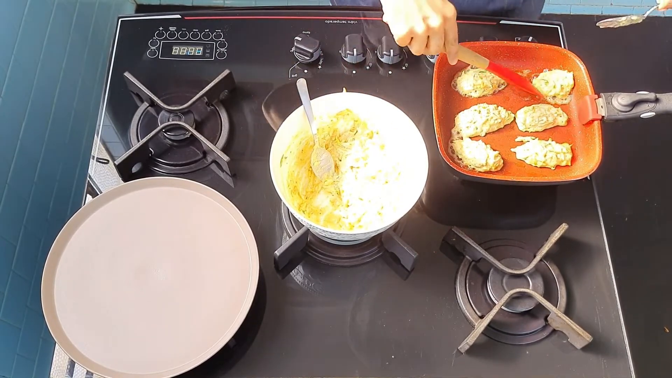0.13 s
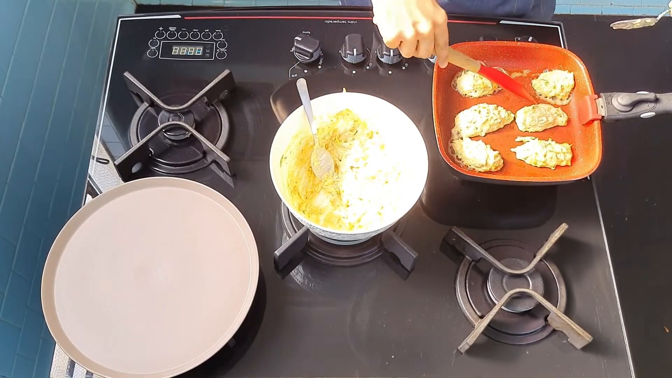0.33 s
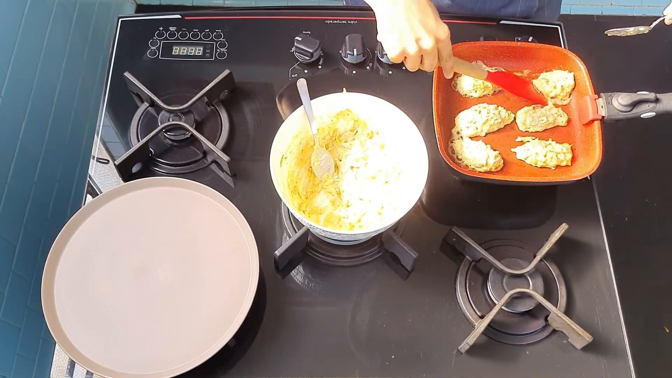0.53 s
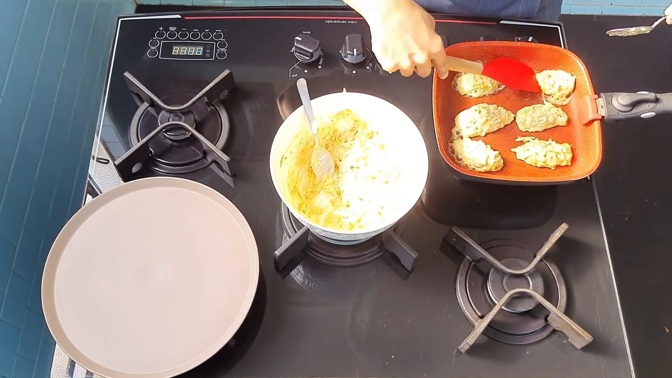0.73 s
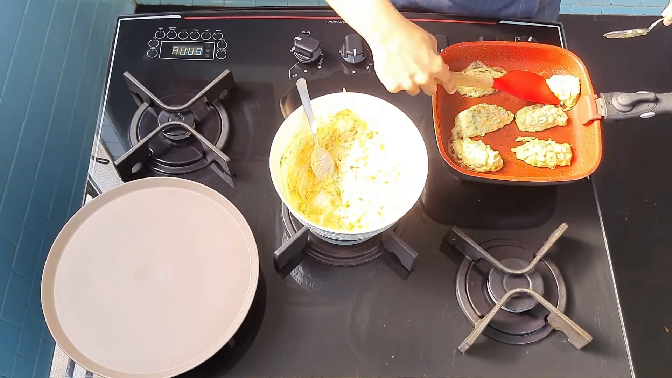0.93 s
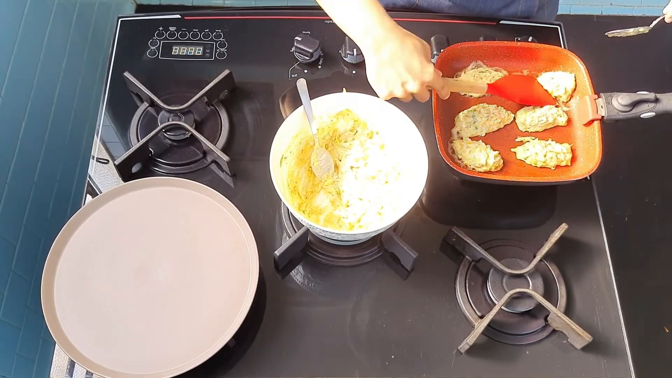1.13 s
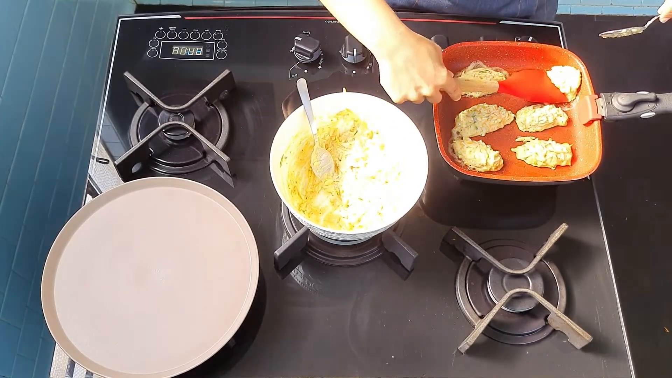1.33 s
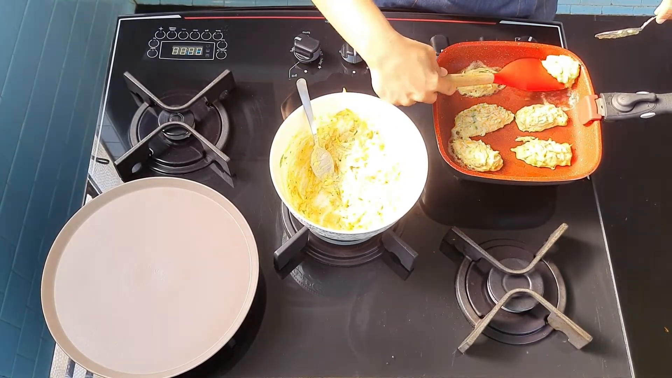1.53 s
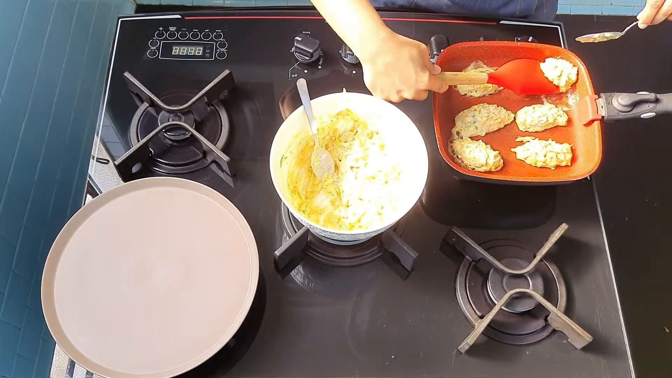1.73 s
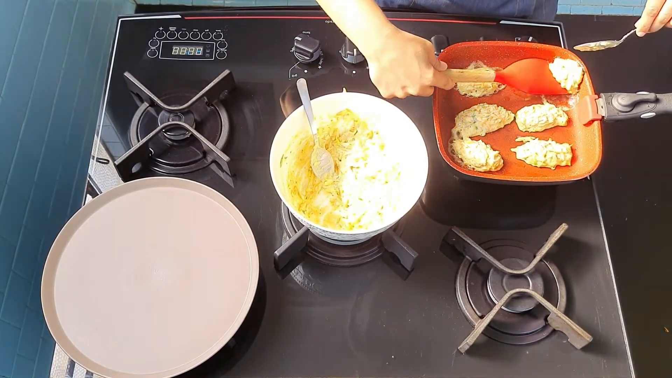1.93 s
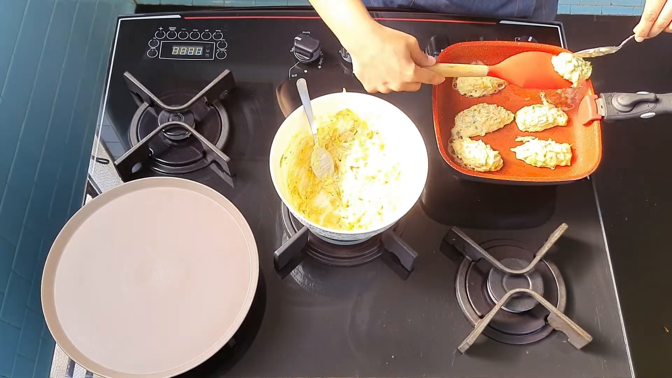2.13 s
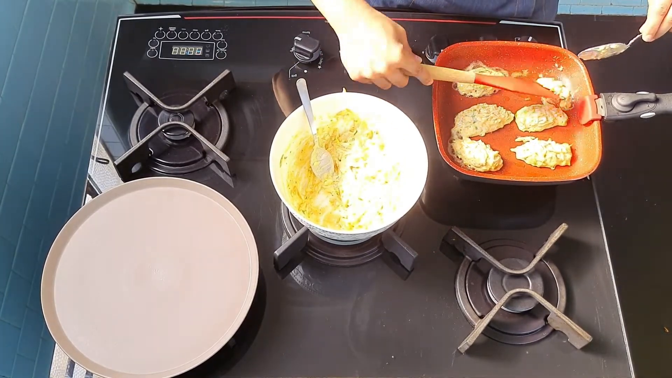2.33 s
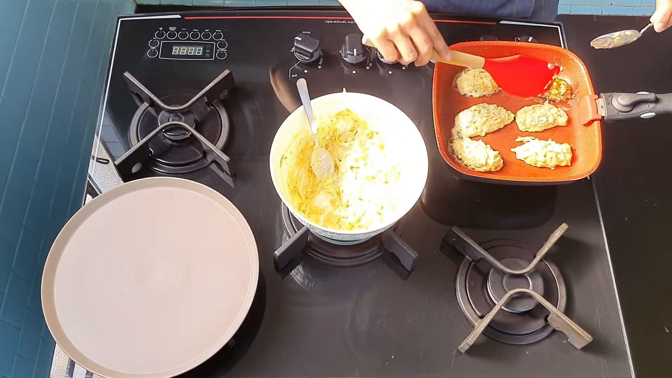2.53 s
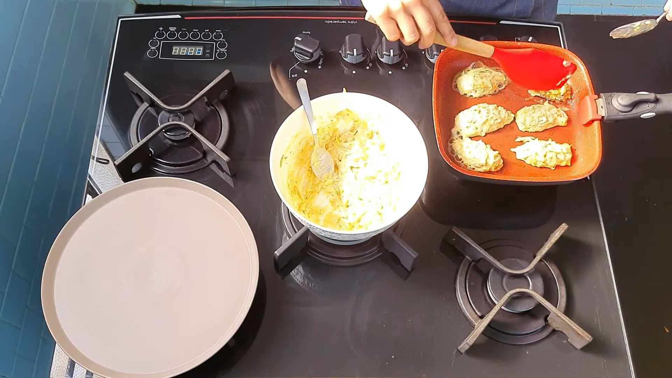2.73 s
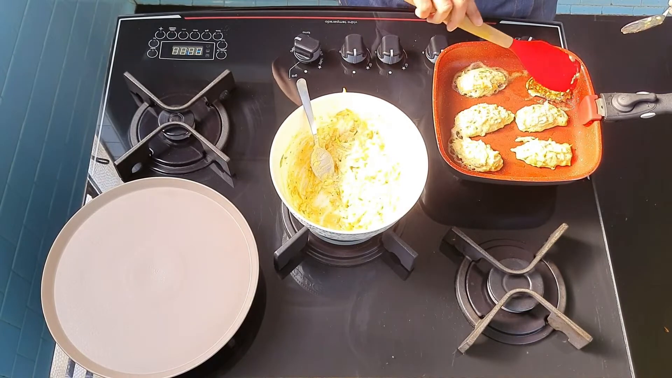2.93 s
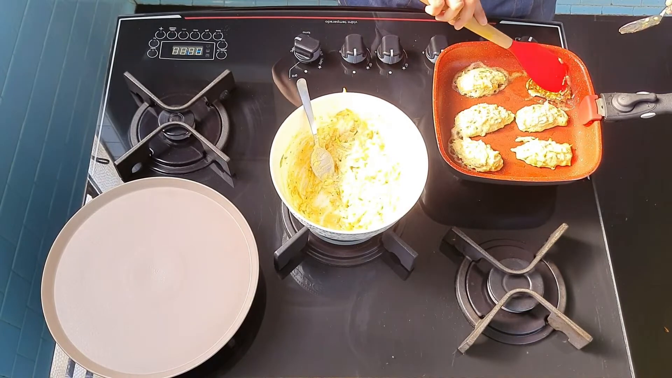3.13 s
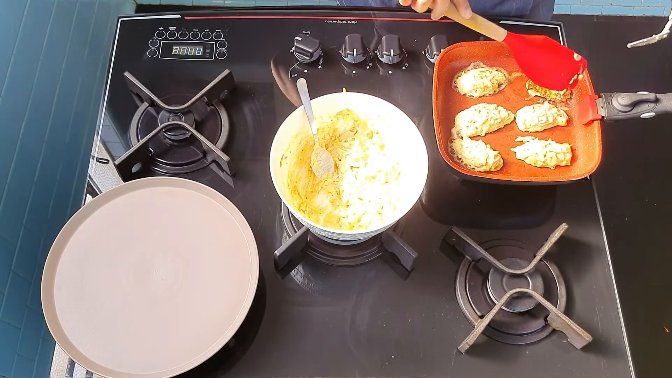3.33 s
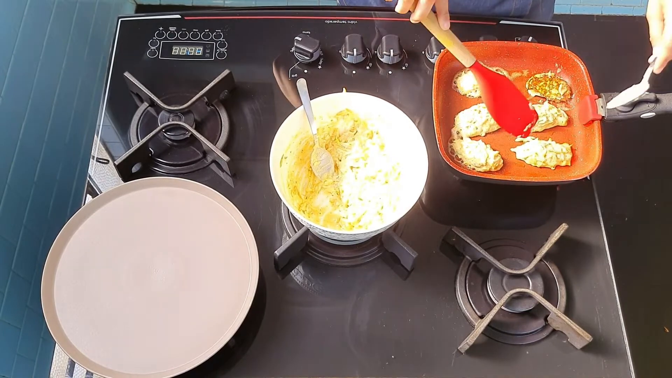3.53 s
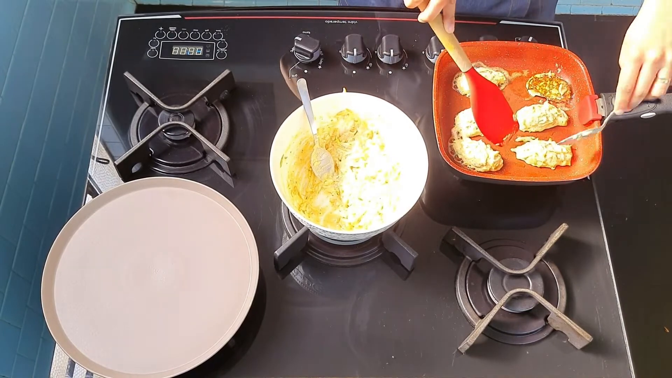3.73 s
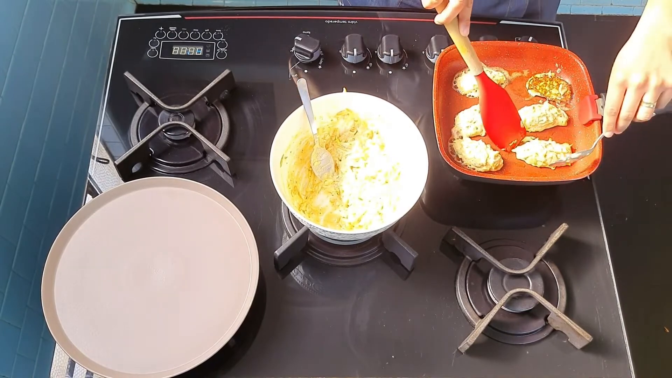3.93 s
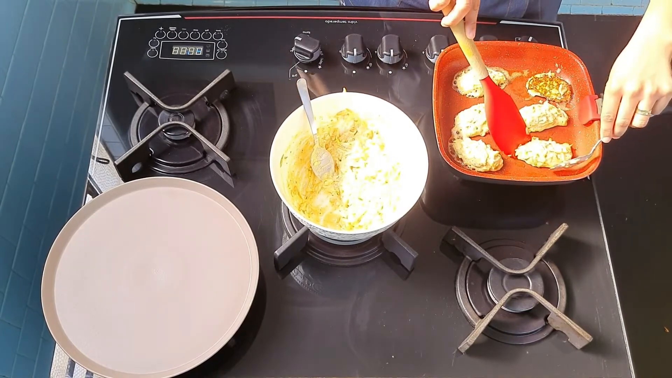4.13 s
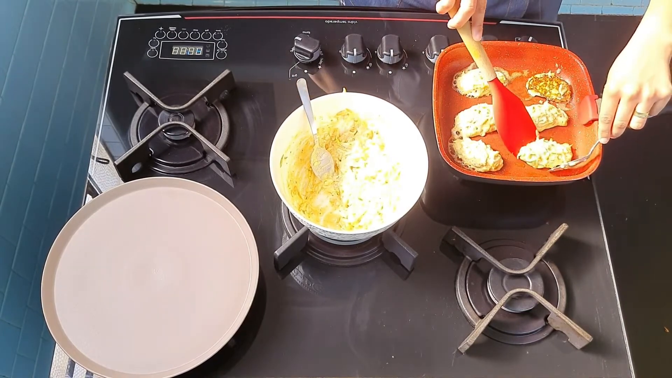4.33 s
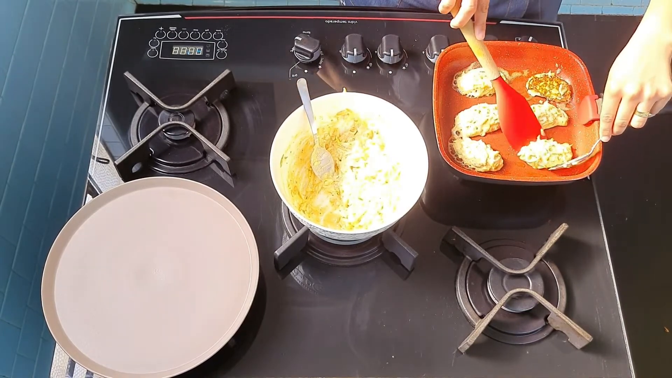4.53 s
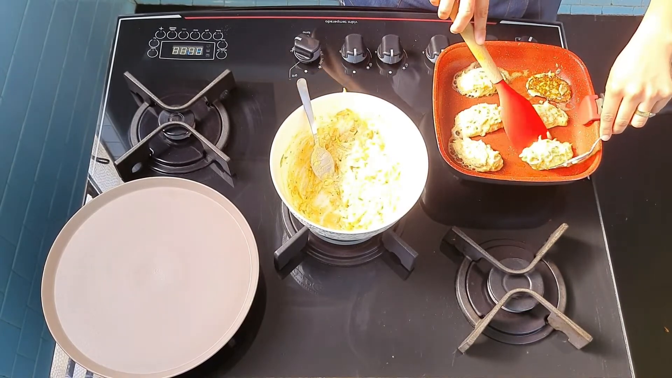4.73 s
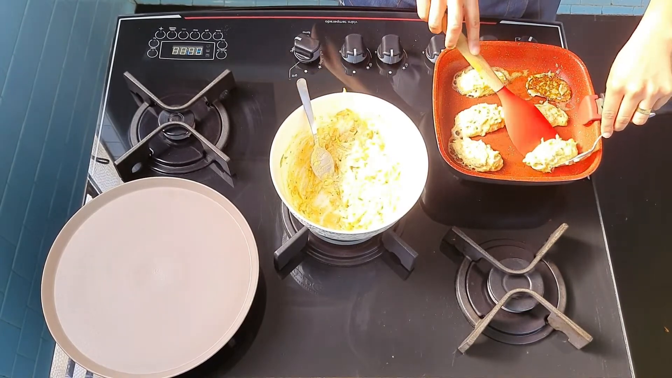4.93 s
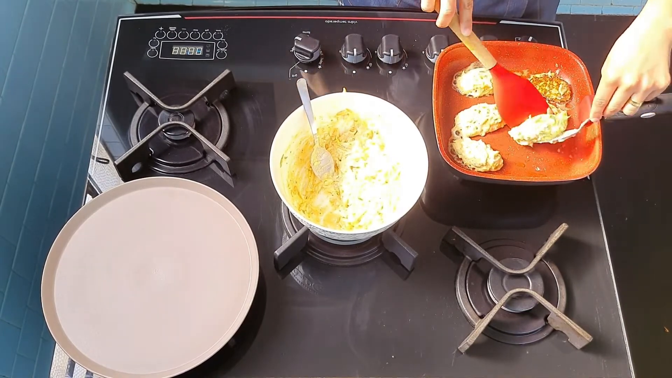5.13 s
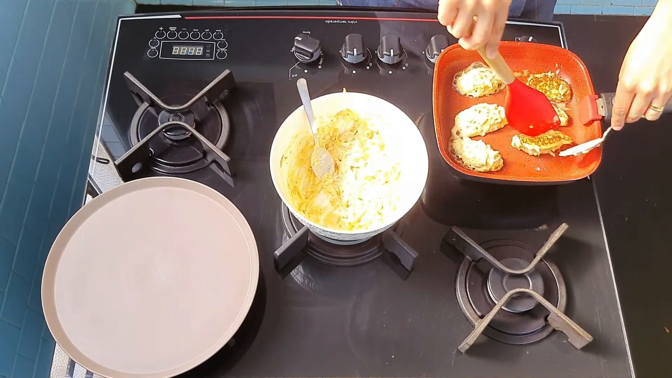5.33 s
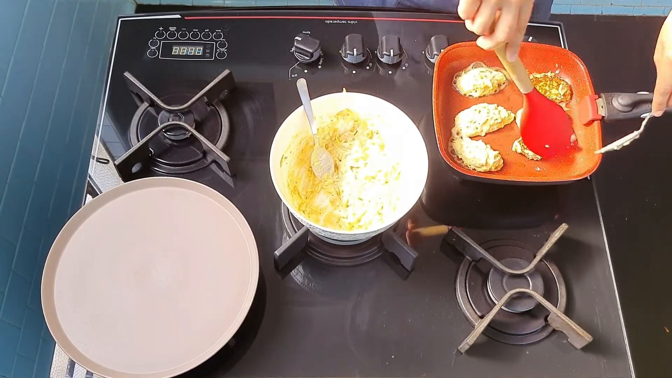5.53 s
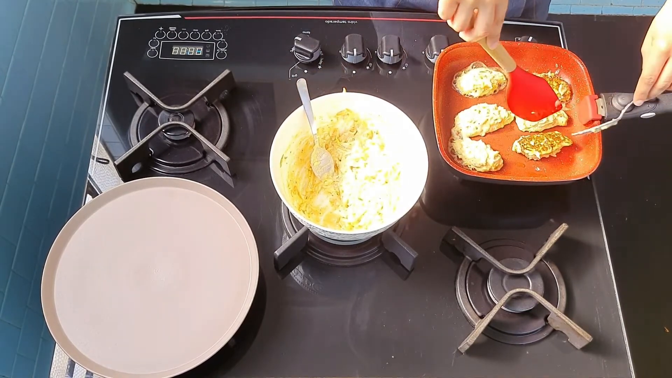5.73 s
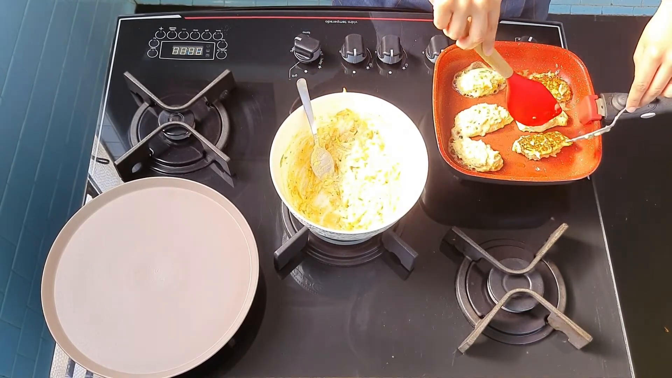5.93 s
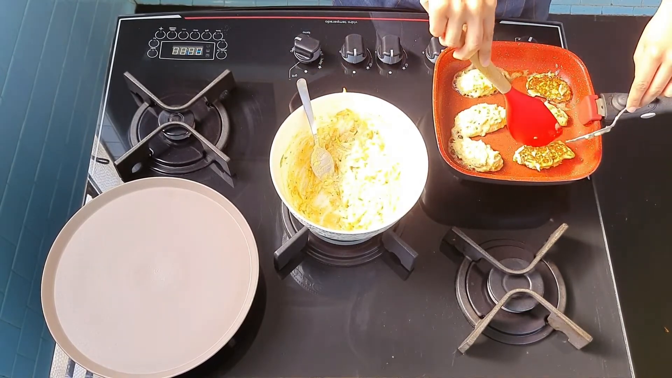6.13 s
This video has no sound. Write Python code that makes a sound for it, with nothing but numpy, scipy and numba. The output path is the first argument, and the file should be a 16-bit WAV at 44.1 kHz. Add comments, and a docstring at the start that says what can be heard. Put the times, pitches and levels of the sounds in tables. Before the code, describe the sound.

Fritters fry in shallow oil, heard close from above by a small, bright microphone with little bass and very short reflections. A faint fan rush and steady mid-pitched hum swell slightly early on, then stay behind. At first the sizzle is thin, with a sharp spit at once. From 0.4 to 1.1 seconds it grows into crackling flurries, with tiny spatula taps near 0.7 and 1.1. Until about 1.9 it is patchy and hollow, its ringing pitches sliding as steam is trapped. A lull follows from 2.1 to 2.55. At 2.6 the oil flares abruptly, spitting hard, with hollow pan ringing and short, low steam gurgles until 3.4. From about 3.6 the frying evens out, airy and steady with scattered pops. Around 5.4 to 5.7 it intensifies with dense crackles and a few more gurgles, and keeps sizzling strongly to the end at 6.2.

```python
"""Vegetable fritters fry in shallow oil, heard by a small microphone from above the stove.
Crowds of damped-sine steam bubbles burst in flurries; steam vents under the fritters ring the pan.
Single drops spit and stir up the fizz, steam gurgles, a spatula taps and slides pitches;
frying flares when a wet side meets the oil. Behind it an extractor fan rushes (noise) and hums (sines)."""
import sys
import numpy as np
from scipy import signal
from scipy.fft import rfft, irfft
from scipy.io import wavfile
from scipy.ndimage import uniform_filter1d
from numba import njit

SR = 44100
rng = np.random.default_rng(int(sys.argv[2]) if len(sys.argv) > 2 else 0)


def decibels_to_gain(level_db):
    """Convert a level in decibels to a linear amplitude gain (20 dB per decade)."""
    exponent = np.asarray(level_db, float) / 20
    return 10 ** exponent


def file_out(sig):
    """Save sig as 16-bit WAV at sys.argv[1]."""
    # one column per channel
    cols = np.atleast_2d(sig).T
    # limit, then scale
    lim = np.clip(cols, -1, 1)
    pcm = np.round(lim * 32767).astype(np.int16)
    wavfile.write(sys.argv[1], SR, pcm)


N = 272538
TIME = np.arange(N) / SR


def colour(x, points):
    """Shapes a spectrum by (frequency [Hz], gain [dB]) points, joined on a log frequency axis."""
    hz, db = np.transpose(points)
    f = np.arange(N // 2 + 1) * SR / N + 1
    gain = decibels_to_gain(np.interp(np.log(f), np.log(hz), db))
    return irfft(rfft(x) * gain, N)


def unit(x):
    """Scales to rms 1."""
    return x / np.sqrt(np.mean(x ** 2))


@njit
def svf(x, g, k):
    """State-variable band-pass whose centre may move, gain 1 at the centre."""
    y, b, l = np.empty(len(x)), 0., 0.
    for i in range(len(x)):
        v = (b + g[i] * (x[i] - l)) / (1 + g[i] * (g[i] + k))
        b, l, y[i] = 2 * v - b, l + 2 * g[i] * v, k * v
    return y


def band(x, hz, width):
    """Two-pole resonance along a pitch track; its width follows the pitch in proportion."""
    return svf(x + 1e-18, np.tan(np.pi * hz / SR), width / np.mean(hz))


def walk(rate):
    """Random levels held 1 / rate s and slewed; spread 1."""
    hold = int(SR / rate)
    steps = rng.standard_normal(N)[np.arange(N) // hold]
    return unit(uniform_filter1d(steps, hold))


@njit
def ring(start, hz, cycles, size, n, sr):
    """Each burst is a damped sine that loses 8.7 dB over its count of cycles."""
    out = np.zeros(n)
    for k in range(len(start)):
        turn = np.exp(hz[k] / sr * (2j * np.pi - 1 / cycles[k]))
        z = size[k] + 0j
        for i in range(start[k], min(n, start[k] + int(6 * cycles[k] * sr / hz[k]))):
            z *= turn
            out[i] += z.imag
    return out


# Spectrum of the fan's air rush: (frequency [Hz], relative density [dB per Hz])
FAN_RUSH = [(20, -31), (50, -7), (120, -0.5), (200, 2.5), (400, 1.5), (600, 4), (1000, -1), (1600, -4),
            (3000, -19.5), (16000, -7.5)]
# Fan hum, swelling in at first: (time [s], fourth multiple of the blade rate [Hz], swell [dB])
FAN_HUM = [(0, 705.6, -12), (.3, 705.6, 0), (1.5, 705.4, 3.5), (2.5, 705.2, 3.5), (3.2, 703.4, 3),
           (4.2, 704.5, 3.5), (6.18, 705.3, 4.5)]
# First four multiples of the blade rate: (level before the swell [dB], wavering [dB])
BLADE_TONES = [(-69.5, 3), (-66, 3), (-66, 3.5), (-52.5, 1.4)]


def fan():
    """Broad rush of air plus blade tones, multiples of one rate, that waver in level."""
    s, fourth_hz, swell_db = np.transpose(FAN_HUM)
    swell_db = np.interp(TIME, s, swell_db)
    rush_db = -46 + 0.14 * swell_db
    rush = decibels_to_gain(rush_db) * unit(colour(rng.standard_normal(N), FAN_RUSH))
    phase = 2 * np.pi * np.cumsum(np.interp(TIME, s, fourth_hz)) / SR / 4
    hum = 0
    for k, (db, waver_db) in enumerate(BLADE_TONES):
        level = decibels_to_gain(db + swell_db + waver_db * walk(8))
        hum = hum + level * np.sqrt(2) * np.sin((k + 1) * phase)
    return rush + hum


def kitchen(x, t60=.025, wet_db=-12):
    """Close reflections off pan walls, hob and tiles: a noise tail decaying 60 dB in t60 s."""
    t = np.arange(SR // 5) / SR
    tail = rng.standard_normal(len(t)) * np.exp(-np.log(1000) * t / t60)
    tail *= t > .001  # direct sound leads by 1 ms
    return x + decibels_to_gain(wet_db) * signal.fftconvolve(x, tail)[:N] / np.sqrt(np.sum(tail ** 2))


# Resonances of pan and food: (unbent pitch [Hz], width of one filter pass [Hz], mean level [dB])
PAN_MODES = [(1450, 180, -12.5), (1954, 25, -4.5), (2220, 420, -12.5), (2550, 40, -5.5), (2795, 370, -13),
             (3147, 320, -1), (4100, 2300, -16.5), (5340, 210, -8.5)]
# The load of food and spatula bends the pan's pitches: (time [s], pitch factor [1])
LOAD_BEND = [(0, 1.0), (.68, 1.01), (.95, .99), (1.2, .97), (1.3, .99), (1.5, .95), (1.57, .97), (1.7, .96),
             (1.9, .92), (2.15, .98), (2.7, 1.01), (3.0, .95), (3.18, .99), (3.4, .96), (3.6, 1.0),
             (3.78, .97), (3.95, 1.02), (6.18, 1.0)]


def pan(x):
    """Steep resonances of pan and food, bent by the load, each flickering and drifting alone."""
    flicker_db, drift = 2.2, .008
    out, bend = 0, np.interp(TIME, *np.transpose(LOAD_BEND))
    for k, (hz, width, db) in enumerate(PAN_MODES):
        own = walk(9)
        track = hz * bend * (1 + drift * own[::-1])
        mode = band(band(x, track, width), track, width)
        out = out + (-1) ** k * decibels_to_gain(db + flicker_db * own) * mode
    return out


# Air pockets between spatula, fritter and pan lift some pitches and cancel others, sliding as the
# spatula moves: (from [s], to [s], start pitch [Hz], end pitch [Hz], width [Hz], gain at centre [dB])
AIR_POCKETS = [(0.353, 0.5, 11300, 11000, 1500, 9), (.36, 0.493, 7600, 7900, 600, 10),
               (.4, .53, 5700, 5750, 450, 5), (.42, 0.562, 4100, 4000, 600, -12),
               (0.506, 0.905, 10600, 11000, 700, 3.5), (0.63, .8, 7750, 7200, 450, 6.5),
               (.58, 1.0, 6900, 6400, 500, -8), (.6, 1.103, 5200, 5200, 400, 5),
               (.7, 0.904, 9500, 8360, 700, -17), (0.817, 0.933, 5960, 6040, 350, 5.5),
               (.9, 1.2, 8800, 8360, 800, -2), (.96, 1.067, 7800, 7800, 450, 5.5),
               (.98, 1.22, 6500, 6400, 450, -1), (1.02, 1.373, 5540, 5740, 450, 8),
               (1.028, 1.15, 10900, 11400, 600, 6.5), (1.12, 1.36, 3650, 4900, 497, -4),
               (1.23, 1.438, 11100, 11600, 1000, 6), (1.247, 1.34, 10000, 10200, 800, 10.5),
               (1.24, 1.54, 9300, 8750, 1000, -8), (1.27, 1.538, 7200, 7500, 600, 3),
               (1.3, 1.5, 4230, 4300, 380, 5), (1.34, 1.548, 2250, 2210, 250, 6),
               (1.36, 1.523, 2900, 2750, 600, 1), (1.46, 1.75, 6540, 6200, 600, -7),
               (1.45, 2.1, 3780, 3750, 700, -4), (1.55, 1.612, 3450, 3330, 450, 5),
               (1.63, 1.9, 2490, 2450, 300, -2), (1.65, 1.74, 7150, 7150, 400, 3),
               (1.68, 1.855, 3100, 2950, 450, 0), (1.665, 2.154, 1450, 1500, 350, 10),
               (2.5, 3.067, 3850, 3600, 550, -8.5), (2.52, 2.68, 6840, 7000, 500, 4.5),
               (2.55, 2.777, 11500, 11300, 900, 2.5), (2.62, 2.78, 6060, 6200, 400, -14),
               (2.6, 3.05, 10300, 10500, 650, -7), (2.653, 3.04, 5500, 5140, 700, 2),
               (2.63, 3.9, 1780, 1740, 200, -4), (2.803, 3.083, 2800, 2700, 300, 1),
               (2.75, 2.92, 1600, 1550, 150, 5), (3.3, 3.55, 2490, 2400, 150, 3.5),
               (2.72, 2.903, 2090, 2220, 200, 5), (2.58, 2.787, 3150, 3250, 300, 5),
               (2.8, 3.447, 790, 894, 120, 2), (2.935, 3.453, 11600, 11300, 900, 6),
               (3.05, 3.49, 1480, 1530, 180, 7), (3.11, 3.31, 6800, 6750, 500, 5.5),
               (3.12, 3.51, 10400, 10700, 650, -6), (3.105, 3.598, 2200, 2150, 170, 3.5),
               (3.154, 3.3, 4500, 4830, 450, -9), (3.1, 3.8, 14000, 14000, 2300, -0.5),
               (2.66, 3.047, 8700, 9300, 900, 1), (3.44, 3.56, 8700, 8700, 600, 1),
               (.86, 1.14, 4500, 4380, 700, 2), (3.32, 3.797, 6700, 6540, 500, 3),
               (3.35, 3.582, 3620, 3460, 500, -9), (3.4, 3.85, 8950, 9300, 700, 2.5),
               (3.447, 3.947, 7100, 7400, 500, -6), (3.49, 3.74, 4900, 5100, 450, 3.5),
               (3.558, 3.677, 3180, 3150, 400, -4), (3.677, 4.0, 4400, 5030, 450, -5),
               (3.78, 3.92, 8000, 8000, 400, 2), (4.502, 6.2, 1290, 1260, 180, 5),
               (5.1, 5.85, 830, 830, 100, 0.5), (5.35, 5.507, 4400, 4300, 700, 3.5),
               (5.57, 5.673, 14400, 14200, 1800, 5), (5.623, 6.0, 5460, 5600, 500, 3)]


def pockets(x):
    """Each pocket is a sliding peak or dip that opens and closes within a few hundredths of a second."""
    fade_s = .03
    x = x.copy()
    for start, end, from_hz, to_hz, width, db in AIR_POCKETS:
        span = slice(int((start - fade_s) * SR), int((end + fade_s) * SR))
        corners = [start - fade_s, start + fade_s, end - fade_s, end + fade_s]
        share = np.interp(TIME[span], corners, [0, 1, 1, 0])
        track = np.interp(TIME[span], [start, end], [from_hz, to_hz])
        x[span] += share * (decibels_to_gain(db) - 1) * band(x[span], track, width)
    return x


# The spatula edge chatters briefly on the pan: (time [s], length [s], level of the first contact [dB])
SPATULA_TAPS = [(.7052, .004, -23), (1.1118, .003, -26)]
# What spatula and pan ring with: (pitch [Hz], level in the tap [dB], decay [cycles])
TAP_RINGS = [(1400, -10, 2), (2300, -5, 3), (3220, 0, 7), (4200, -6, 3), (5250, -1, 10), (7450, 0, 9)]


def taps():
    """Five quick contacts per tap, each weaker and ringing the same short modes."""
    s, length, db = np.transpose(SPATULA_TAPS)[:, :, None, None]
    hz, mode_db, cycles = np.transpose(TAP_RINGS)
    late = np.arange(5)[:, None] / 5 + .1 * rng.random((len(SPATULA_TAPS), 5, 1))
    size = decibels_to_gain(db + mode_db - 4 * late)
    every_ring = np.zeros((len(SPATULA_TAPS), 5, len(hz)))
    columns = ((s + late * length) * SR, hz, cycles, size)
    start, hz, cycles, size = (np.ravel(c + every_ring) for c in columns)
    return ring(start.astype(np.int64), hz, cycles, size, N, SR)


# Steam gurgling out from under a turned fritter, pitch mostly rising:
# (time [s], start pitch [Hz], end pitch [Hz], length [s], level [dB; note peaks 6 dB above])
STEAM_GURGLES = [(2.82, 860, 880, 0.045, -49), (2.87, 597, 630, .05, -41), (2.9, 874, 910, 0.035, -52),
                 (2.93, 830, 810, 0.045, -41), (3.06, 808, 852, 0.067, -39), (3.16, 850, 876, 0.05, -41),
                 (3.28, 800, 814, 0.046, -45), (3.37, 956, 1030, 0.058, -46), (5.37, 805, 810, 0.059, -41),
                 (5.45, 840, 900, .05, -54), (5.65, 780, 807, 0.057, -41), (5.87, 800, 824, .06, -43),
                 (6.1, 785, 795, 0.066, -46)]


def gurgles():
    """A steam pocket swells, sings a short sliding note and empties."""
    out = np.zeros(N)
    for s, from_hz, to_hz, length, db in STEAM_GURGLES:
        n, at = int(length * SR), int(s * SR)
        phase = 2 * np.pi * np.cumsum(np.linspace(from_hz, to_hz, n)) / SR
        out[at:at + n] += decibels_to_gain(db) * 2 * np.hanning(n) * np.sin(phase)
    return out


# Loud spits of water in the oil, levels before the gains in spits():
# (time [s], crack level [dB], tick level [dB], tick pitch [Hz], volley length before stretch [s])
LOUD_SPITS = [(.052, -16, -19, 6300, .0055), (.0619, -36, -32, 6300, .003), (.1749, -27, -38, 6000, .002),
              (.2159, -27, -37, 6500, .0024), (.2637, -28, -40, 7000, .001), (.2971, -32, -32, 6500, .001),
              (.3069, -23, -36, 7400, .0017), (.351, -24, -29, 5900, .001), (.4398, -15, -23, 7600, .0012),
              (.4953, -22, -31, 6600, .0011), (.5046, -19, -24, 5900, .003), (.5426, -16, -28, 6700, .0016),
              (.5643, -13, -36, 6000, .0017), (.6117, -12, -34, 6400, .0043),
              (.6293, -18, -33, 5200, .0034), (.7059, -24, -30, 7400, .0045),
              (.8393, -17, -31, 6100, .0011), (.8613, -17, -33, 4500, .0012), (.8981, -17, -26, 3600, .001),
              (.9218, -9, -22, 5900, .0057), (1.0012, -13, -27, 4200, .001),
              (1.0239, -14, -19, 5400, .0021), (1.1015, -17, -30, 4600, .0026),
              (1.112, -17, -18, 6000, .0038), (1.2248, -17, -29, 5600, .0015),
              (1.2739, -21, -31, 4100, .0032), (1.2962, -20, -27, 5800, .0013),
              (1.317, -19, -29, 6200, .0024), (1.3565, -26, -29, 2900, .002), (1.397, -24, -27, 3600, .002),
              (1.4891, -18, -24, 2900, .0014), (1.5794, -13, -25, 3400, .0056),
              (1.672, -30, -35, 3000, .001), (1.7165, -30, -31, 3100, .004), (1.8003, -22, -33, 5000, .001),
              (1.8215, -27, -35, 3000, .001), (1.9245, -24, -32, 2800, .001),
              (1.9508, -21, -34, 4000, .0028), (2.0208, -17, -30, 5600, .002), (2.08, -28, -33, 2800, .001),
              (2.411, -28, -36, 6000, .002), (2.4421, -24, -38, 6000, .003), (2.4595, -25, -37, 6500, .003),
              (2.5122, -18, -26, 5600, .002), (2.5505, -31, -39, 3800, .001), (2.587, -29, -35, 3400, .002),
              (2.6167, -20, -22, 6700, .0029), (2.6625, -6, -20, 6800, .005),
              (2.6958, -14, -23, 6500, .001), (2.7283, -13, -19, 6400, .001),
              (2.7887, -17, -18, 6500, .001), (2.8963, -15, -21, 6200, .001),
              (2.9074, -10, -19, 7300, .0033), (3.0196, -8, -20, 6800, .002),
              (3.1471, -17, -28, 5200, .003), (3.2036, -12, -22, 6800, .001), (3.2263, -7, -20, 6800, .003),
              (3.2438, -16, -11, 6900, .0011), (3.2522, -12, -24, 6800, .001),
              (3.3156, -17, -20, 5000, .0013), (3.3771, -15, -19, 6300, .001),
              (3.5161, -22, -19, 6000, .001), (3.5633, -22, -21, 5500, .001),
              (3.6823, -17, -29, 4600, .0031), (3.6988, -17, -29, 6100, .0014),
              (3.818, -21, -30, 7500, .002), (3.844, -21, -29, 7000, .002), (3.902, -20, -34, 6500, .003),
              (3.972, -23, -27, 3800, .003), (4.073, -28, -32, 3400, .001), (4.0488, -17, -29, 6400, .003),
              (4.1088, -26, -27, 7400, .002), (4.1361, -26, -27, 7000, .001), (4.242, -22, -30, 6500, .002),
              (4.2578, -26, -28, 5600, .002), (4.2929, -22, -30, 6600, .003),
              (4.4575, -18, -29, 6000, .0039), (4.5297, -19, -27, 6400, .0021),
              (4.5975, -22, -25, 6500, .001), (4.6477, -14, -26, 5800, .0015),
              (4.7985, -19, -28, 6800, .002), (4.8275, -18, -28, 6800, .001),
              (4.8435, -17, -24, 6800, .0018), (4.864, -24, -28, 3400, .002),
              (5.2576, -18, -35, 6200, .0034), (5.352, -24, -30, 3800, .003), (5.474, -11, -30, 5400, .004),
              (5.524, -16, -28, 7000, .002), (5.585, -14, -26, 4600, .004), (5.607, -14, -30, 6500, .002),
              (5.627, -14, -30, 6500, .002), (5.6631, -15, -19, 5700, .0014), (5.778, -16, -28, 6800, .002),
              (5.8245, -21, -24, 5400, .002), (5.9657, -17, -36, 4200, .003)]
# Small spits soften once the frying is even: (time [s], level change [dB])
SMALL_SPIT_CALM = [(3.4, 0), (4.0, -2)]


def all_spits():
    """The loud spits plus random small ones, louder where the oil fries harder, as columns."""
    crack_over_fizz_db, tick_over_sputter_db, scatter_db = -0.5, -7, 4.5
    when, pitch, length = rng.random((260, 3)).T
    when = when * (N / SR - .02) + .005
    change_db = scatter_db * rng.standard_normal((2, len(when)))
    change_db += np.interp(when, *np.transpose(SMALL_SPIT_CALM))
    s, fizz_db, sputter_db, _ = np.transpose(FRYING_LEVELS)
    crack_db = np.interp(when, s, fizz_db) + crack_over_fizz_db + change_db[0]
    tick_db = np.interp(when, s, sputter_db) + tick_over_sputter_db + change_db[1]
    small = [when, crack_db, tick_db, 3800 * 2 ** pitch, .001 + .002 * length ** 2]
    return np.hstack([np.transpose(LOUD_SPITS), small])


def spits(drops, pan_db=-3):
    """A drop gives a low tick with a dull thud, and a high crack in a fading volley of tiny bursts."""
    s, crack_db, tick_db, tick_hz, length = drops
    count = len(s)
    at = (s * SR).astype(np.int64)
    crack_hz = np.clip(12500 * 2 ** (.22 * rng.standard_normal(count)), 10600, 14600)
    tick_gain_db, thud_db, crack_gain_db = 7.5, -14, 3  # thud is relative to the tick
    tick = ring(at, tick_hz, np.full(count, 2.2), decibels_to_gain(tick_db + tick_gain_db), N, SR)
    thud_size = decibels_to_gain(tick_db + tick_gain_db + thud_db)
    tick += ring(at, .55 * tick_hz, np.full(count, 1.5), thud_size, N, SR)
    crack = ring(at, crack_hz, np.full(count, 3.2), decibels_to_gain(crack_db + crack_gain_db), N, SR)

    # 24 tiny bursts a drop, the first just ahead of the crack
    spray_db, fading_db, lead_s, stretch = -5.5, 8, .0007, 1.4
    late, pitch, low = np.moveaxis(rng.random((count, 24, 3)), 2, 0)
    start = ((s[:, None] - lead_s + stretch * late * length[:, None]) * SR).astype(np.int64)
    low = low < .4  # share of bursts pitched round 6.8 kHz and sized with the tick
    hz = np.where(low, 6800, crack_hz[:, None]) * 2 ** (.8 * (pitch - .55))
    hz = np.minimum(hz, .4 * SR)
    size = decibels_to_gain(np.where(low, tick_db[:, None], crack_db[:, None]) + spray_db - fading_db * late)
    volley = ring(start.ravel(), hz.ravel(), np.full(start.size, 2.5), size.ravel(), N, SR)
    tiny = colour(crack + volley, [(1000, -30), (5000, 0), (16000, 0)])
    return tick + decibels_to_gain(pan_db) * pan(tick) + tiny


def bubbles(count, hz, octaves, cycles, spread_db, flurry_db, flurry, most_db=16):
    """A crowd of bursts: pitches scatter round the usual bubble size, levels scatter by spread_db."""
    when, length, big = rng.random((count, 3)).T
    start = (when * N).astype(np.int64)
    own_hz = np.clip(hz * 2 ** (octaves * rng.standard_normal(count)), 200, 17000)
    own_db = np.minimum(-spread_db * np.log(big), most_db)  # positive spread: a few much louder
    size = decibels_to_gain(own_db + flurry_db * flurry[start]) * np.sqrt(own_hz)
    return unit(ring(start, own_hz, cycles * (.5 + length), size, N, SR))


# How hard the oil fries, before flurries and stirring:
# (time [s], fine fizz level [dB], sputter level [dB], level of vents ringing the pan [dB])
FRYING_LEVELS = [(0, -43, -47.5, -53), (.14, -44.5, -44.5, -52), (.19, -39, -52, -52),
                 (.33, -43, -43.5, -52), (.41, -36.5, -44, -48), (.66, -31.5, -40, -49),
                 (.702, -32, -38, -38), (.716, -31, -37, -34), (.77, -33.5, -31.5, -37.5),
                 (.83, -33.5, -35, -37), (.93, -30, -27.5, -34.5), (1.03, -26, -33.5, -34),
                 (1.13, -35, -35.5, -34), (1.21, -36, -41.5, -39), (1.34, -37, -36.5, -36.5),
                 (1.48, -32.5, -28, -35), (1.55, -38.5, -36, -37), (1.61, -39, -39, -36),
                 (1.635, -42, -43.5, -45), (1.73, -35.5, -40, -38.5), (1.92, -36, -42, -46),
                 (2.131, -38, -42.5, -45.5), (2.18, -40, -48, -52.5), (2.568, -40, -46.5, -51.5),
                 (2.62, -28.5, -32.5, -50), (2.67, -24.5, -32, -46), (2.76, -25.5, -27, -35.5),
                 (2.87, -32, -24.5, -36.5), (3.02, -30.5, -24.5, -32), (3.1, -26.5, -30.5, -36.5),
                 (3.22, -28.5, -27, -39), (3.351, -35.5, -27.5, -45), (3.55, -32, -30.5, -36),
                 (4.0, -33.5, -35.5, -41.5), (4.65, -30.5, -37, -40), (5.33, -30, -36, -41),
                 (5.44, -28, -33.5, -40.5), (5.66, -27, -36, -35.5), (5.78, -26.5, -33.5, -37),
                 (6.18, -28.5, -35, -37)]
# Low seething of the oil: (time [s], level [dB])
SEETHE_LEVELS = [(0, -63), (.6, -47), (1.1, -58), (1.9, -50), (2.3, -66), (2.55, -48.5), (2.8, -35.5),
                 (3.2, -41), (3.5, -43), (4.0, -41.5), (4.35, -43.5), (4.9, -41.5), (5.33, -43.5),
                 (5.45, -40), (6.18, -39.5)]
# Steam trapped under a lifted or freshly turned fritter rings hollow: (time [s], power share [0-1])
HOLLOW_SHARE = [(0, .4), (.6, .4), (.7, .62), (1.2, .66), (1.35, .93), (1.9, .9), (2.2, .4), (2.6, .97),
                (3.4, .95), (3.6, .75), (3.9, .3), (6.18, .22)]
# How clumpy the frying is: (time [s], share of full flurry depth [0-1])
CLUMPINESS = [(0, 0.45), (2.6, 0.87), (3.4, 0.23), (4.0, 0.38), (6.18, 0.1)]
# Strongest flurries of fine fizz: (centre time [s], length [s], level over the fizz [dB])
FIZZ_FLURRIES = [(.455, .02, 3), (.897, .008, 3), (.935, .02, 3), (1.02, .025, 4), (1.103, .015, 4),
                 (1.475, .03, 3), (2.675, .02, 3), (2.91, .02, 2.5), (3.02, .015, 5), (3.195, .02, 3),
                 (3.235, .02, 1.5), (3.315, .015, 3), (3.515, .03, 4), (4.05, .02, 5), (4.465, .015, 5),
                 (4.54, .025, 4), (4.6, .02, 3), (4.64, .02, 3), (4.72, .025, 4), (4.795, .015, 3),
                 (4.86, .035, 4), (5.41, .02, 2), (5.477, .02, 6.5), (5.53, .012, 3), (5.59, .015, 4.5),
                 (5.625, .025, 4.5), (5.665, .012, 3), (5.82, .03, 1.5), (5.968, .015, 3)]


def frying(drops):
    """Bubble crowds in shared flurries; each spit stirs up the fizz; trapped steam rings the pan."""
    s, *columns = np.transpose(FRYING_LEVELS)
    fizz_db, sputter_db, vent_db = (np.interp(TIME, s, c) for c in columns)
    seethe_db = np.interp(TIME, *np.transpose(SEETHE_LEVELS))
    hollow = np.clip(np.interp(TIME, *np.transpose(HOLLOW_SHARE)), 0, 1)

    # power of the fizz stirred up by each spit: level under its crack, dying time
    stir_db, stir_s = -11, .004
    kicks = np.bincount((drops[0] * SR).astype(np.int64), decibels_to_gain(drops[1] + stir_db) ** 2, N)
    stirred = signal.lfilter([1], [1, -np.exp(-1 / (stir_s * SR))], kicks)

    shared = unit(.4 * walk(35) + walk(60) + .9 * walk(120))
    clumpy = np.interp(TIME, *np.transpose(CLUMPINESS))
    fine = clumpy * unit(shared + 0.36 * walk(56))
    coarse = clumpy * unit(shared + .5 * walk(49))
    flurry_db = sum(db * np.exp(-2 * ((TIME - s) / length) ** 2) for s, length, db in FIZZ_FLURRIES)
    fizz_db = fizz_db + flurry_db
    sputter_db = sputter_db + .5 * flurry_db

    fizz = bubbles(count=60000, hz=13110, octaves=0.429, cycles=3.5,
                   spread_db=1.5, flurry_db=3.0, flurry=fine)
    sputter = bubbles(count=35000, hz=7150, octaves=0.37, cycles=1.78,
                      spread_db=2.0, flurry_db=1.5, flurry=coarse)
    clicks = bubbles(count=20000, hz=3600, octaves=0.48, cycles=0.91,
                     spread_db=2.5, flurry_db=0.3, flurry=coarse)
    vents = np.sqrt(hollow) * unit(pan(clicks)) + np.sqrt(1 - hollow) * clicks
    seethe = bubbles(count=20000, hz=599.3, octaves=0.683, cycles=14.0,
                     spread_db=2.0, flurry_db=3.0, flurry=walk(11))
    # closely pitched second crowd; its negative spread makes some bursts quieter
    seethe += decibels_to_gain(2.0) * bubbles(count=4000, hz=855.0, octaves=0.095, cycles=2.1,
                                 spread_db=-8.0, flurry_db=-0.8, flurry=walk(15), most_db=5)

    out = np.sqrt(decibels_to_gain(fizz_db) ** 2 + stirred) * fizz
    out += decibels_to_gain(sputter_db) * sputter
    out += decibels_to_gain(vent_db) * vents
    return out + decibels_to_gain(seethe_db) * unit(seethe)


def scene():
    """Pan in its kitchen, fan behind; bursts this small radiate no bass."""
    drops = all_spits()
    oil = pockets(frying(drops) + gurgles())
    knocks = kitchen(spits(drops) + taps())
    stove = colour(oil + knocks, [(40, -41), (250, -6.0), (500, -5.5), (16000, -1.5)])
    return (stove + fan())[None]


def top_cut(x):
    """Nothing passes above the cut-off."""
    return signal.sosfilt(signal.butter(12, 16370, fs=SR, output="sos"), x)


def record(dry):
    """A small microphone above the stove, bright near the top and cut above it."""
    # both curves: (frequency [Hz], gain [dB])
    mic = [(20, -0.5), (1000, -4.5), (4000, -1.5), (9000, 2.0), (12000, 4.0), (14500, 8.0), (15300, 4.5)]
    cut = [(15450, -2), (15600, -25), (16000, -55), (16400, -70)]
    mix = colour(dry[0], mic + cut)[None]
    return top_cut(mix)


dry = scene()
out = record(dry)
file_out(out)
```